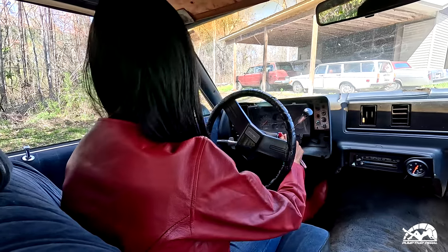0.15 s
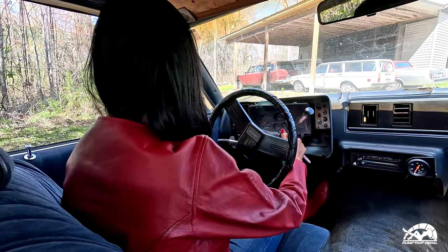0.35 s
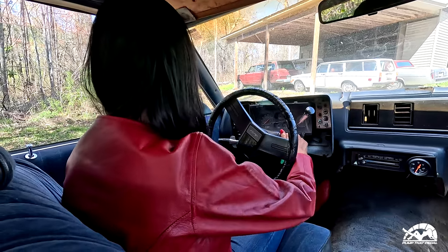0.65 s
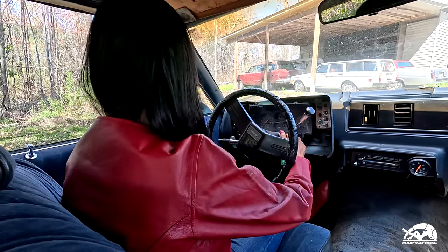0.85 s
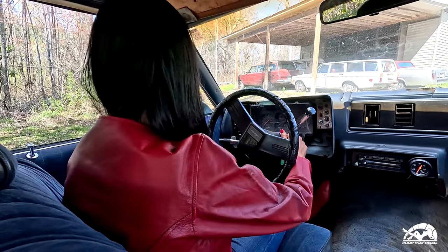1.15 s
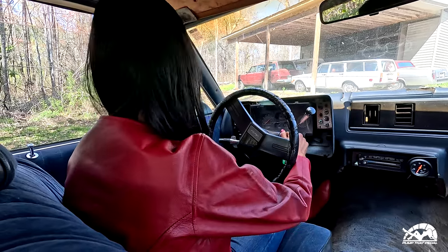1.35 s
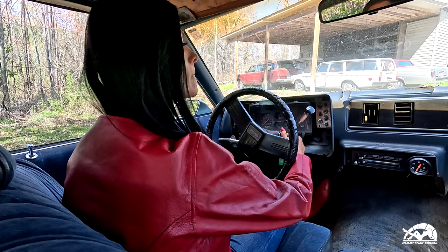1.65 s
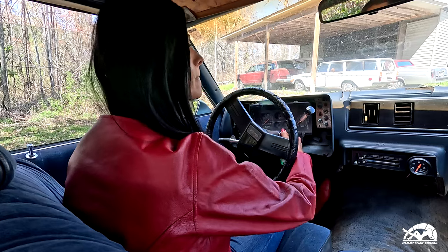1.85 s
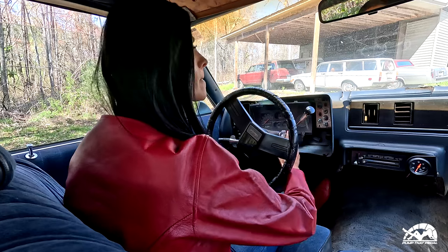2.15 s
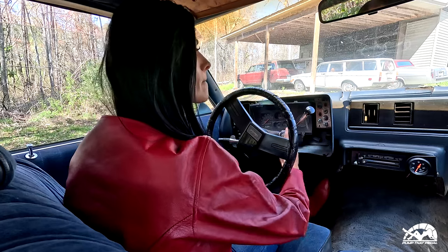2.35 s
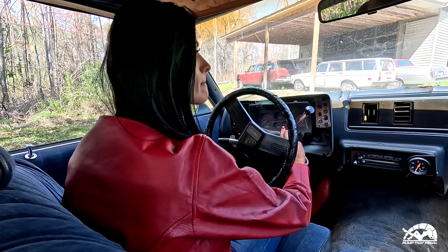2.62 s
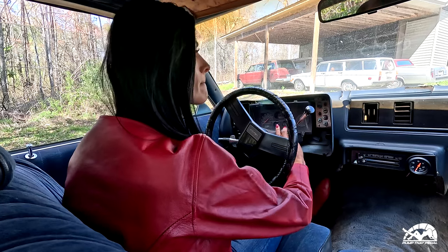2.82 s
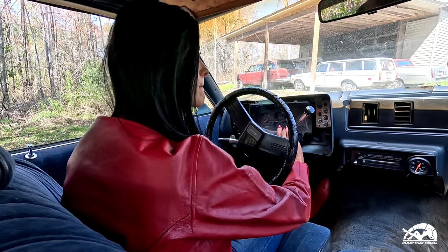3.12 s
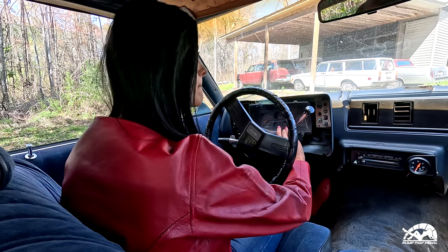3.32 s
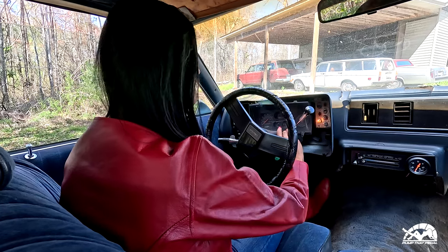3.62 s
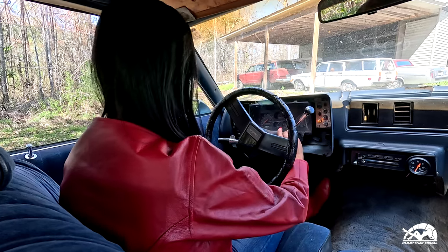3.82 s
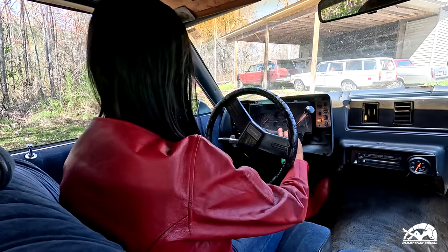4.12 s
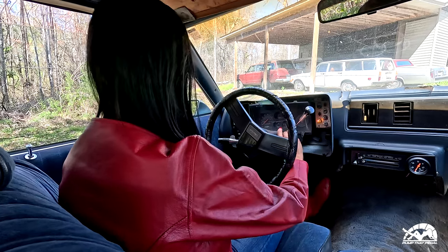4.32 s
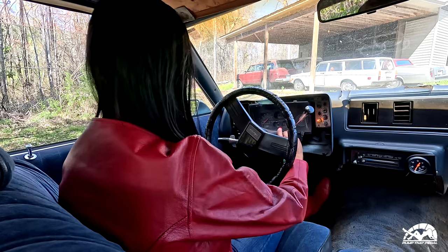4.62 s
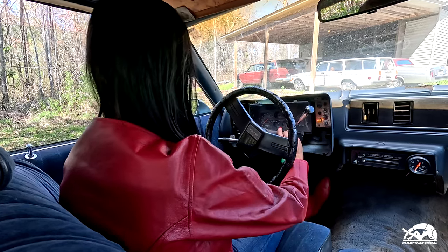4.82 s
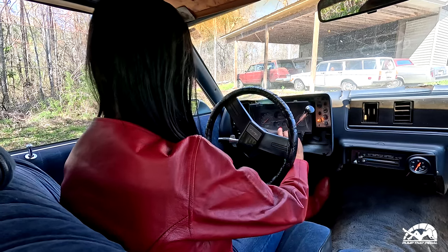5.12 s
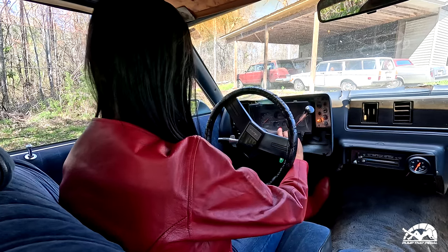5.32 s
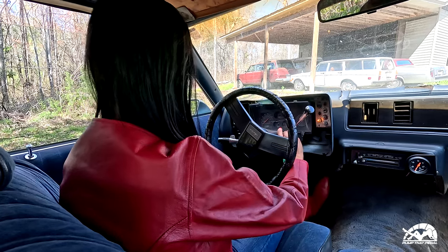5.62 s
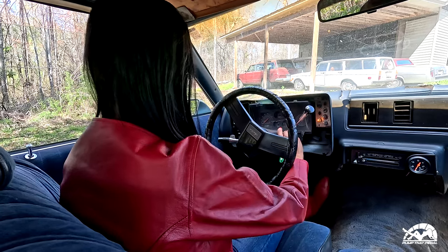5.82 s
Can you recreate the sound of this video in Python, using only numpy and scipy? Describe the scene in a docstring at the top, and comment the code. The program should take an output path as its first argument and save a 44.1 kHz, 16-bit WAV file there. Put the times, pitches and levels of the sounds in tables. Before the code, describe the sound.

A quiet car cabin holds a faint low rumble, with everything heard close up. From about 0.4 to 1 second, keys clink lightly and the ignition lock ticks, while a sleeve rustles softly. A sharp metallic snap comes at 1.7 seconds as the key slides in, followed by brighter jingling from 2 to 2.5 seconds. The lock clicks again around 2.9 and 3.1 seconds as the key turns, with a few dull knocks. At about 3.8 seconds the starter engages with a heavy clunk and a short, labouring groan, much louder than the keys. Another clunk follows near 4.2 seconds, and it settles into rapid, rhythmic cranking: a high gear whine and rattle surging with each stroke, over a deep throb from the rocking engine. The cranking slows very slightly and continues to the end, near 6 seconds, without the engine ever firing.

```python
"""Inside an old car, keys jingle and a sleeve rustles as the driver slides a key in and turns it.
The starter's magnetic switch (the solenoid) clunks and pushes a small gear into the engine's big one.
The starter groans through the first compression, when a piston squeezes the air in its cylinder.
Then it cranks the engine, which never fires: the gears whine and rattle, surging with every
compression, while the engine rocks on its mounts."""
import sys
import numpy as np
from scipy import signal
from scipy.fft import rfft, irfft
from scipy.io import wavfile
from scipy.ndimage import uniform_filter1d

SR = 44100
rng = np.random.default_rng(int(sys.argv[2]) if len(sys.argv) > 2 else 0)


def put_to_file(sound):
    """Save the sound as 16-bit audio at rate SR, in the file named by the first command-line argument."""
    columns = np.atleast_2d(sound).T  # one column per channel
    safe = np.clip(columns, -1, 1)
    whole_steps = np.round(safe * 32767)
    wavfile.write(sys.argv[1], SR, whole_steps.astype(np.int16))


N = 262836
TIME, FREQS = np.arange(N) / SR, np.fft.rfftfreq(N, 1 / SR)

# heavy blows of solenoid, small gear and first full compression: start_s, level_db, decay_s
CLUNKS = [(3.767, -43, 0.014), (3.779, -30.5, 0.026), (3.923, -40, 0.0045), (4.154, -35, 0.025)]
ENGAGE_S, ENGAGE_DB, _ = CLUNKS[1]  # the blow with which the gears meet
# how alike left and right sound: pitch_hz, likeness (0 to 1)
LIKENESS = [(30, 1), (125, 0.99), (250, 0.92), (500, 0.9), (1000, 0.83), (2000, 0.79), (4000, 0.71),
            (8000, 0.96), (13000, 0.18)]


def cranking():
    """The starter's small gear whines, rattles and clashes on the big one, loudest at each compression."""
    # ringing (+) and dips (-) of the starter's housing: pitch_hz, width_hz, level_db
    housing = [(1190, 55, 13), (1700, 100, 5), (1860, 160, -5), (2280, 160, 4), (2800, 320, 6),
               (3400, 130, 5), (4130, 120, -4), (4650, 160, -5), (5400, 140, -4), (5650, 200, 7),
               (7150, 150, 5), (8570, 200, 5)]
    # tone colour of colliding teeth: pitch_hz, level_db
    clash_colour = [(300, 3.5), (1000, -2.5), (1700, -4.5), (2800, 1), (5000, -1), (7500, -12.5),
                    (10500, -29.5), (15000, -51)]
    _, rattle_db, whine_db, hum_db, clash_db, _ = np.transpose(strokes())
    tooth_hz = starter_speed()
    teeth = np.cumsum(tooth_hz * (1 + .003 * wander(35))) / SR  # count of teeth gone by
    whine = amp(2.5) * gear_whine(teeth, tooth_hz.mean())
    whine *= surges(whine_db, rise=1, hold_s=.024, linger=.5, fall_s=.021, floor_db=-14)
    # the lowest note hums a moment ahead of its overtones
    hum = amp(-.5) * np.cos(2 * np.pi * teeth) * amp(2 * wander(40))
    hum *= surges(hum_db, rise=.7, hold_s=.005, linger=1.3, fall_s=.018, floor_db=-20, early_s=.009)
    tones = cabin_echo(whine + hum, echo_db=-15, centre=1.5)
    rattle = amp(-6.5) * gear_rattle(teeth, housing, steady=.6, puff_length=.4, flicker_db=1.5)
    rattle *= surges(rattle_db, rise=1.2, hold_s=.02, linger=.3, fall_s=.021, floor_db=-3, early_s=.004)
    # on hard strokes the teeth take up their slack with a short, bright clash
    clash = amp(-2) * noise(clash_colour, peaks=housing)
    clash *= surges(clash_db, rise=1.1, hold_s=.019, linger=.2, fall_s=.017, floor_db=-40)
    return tones + rattle + clash


def starter_speed(leap_share=.045, delay_s=.005, width_s=.01):
    """Teeth meeting per second; the speed leaps as each compression lets go and sags back at once."""
    # speed, surging once in every round of the cylinders: time_s, tooth_rate_hz
    speed = [(4.07, 585), (4.13, 562), (4.25, 565), (4.3, 582), (4.43, 555), (4.72, 556), (4.84, 574),
             (4.91, 554), (5.04, 564), (5.11, 552), (5.3, 562), (5.37, 573), (5.5, 552), (5.64, 543),
             (5.71, 550), (5.78, 547), (5.84, 562), (5.91, 546)]
    starts = np.transpose(strokes())[0]
    leaps = np.exp(-((TIME[:, None] - starts - delay_s) / width_s) ** 2).sum(1)
    return np.interp(TIME, *np.transpose(speed)) * (1 + leap_share * leaps)


def gear_whine(teeth, tooth_hz, small_gear_teeth=9, fuzz=.15):
    """Meeting teeth sing overtones; the small gear's wobble adds a faint tone above and below each."""
    # overtones: multiple_of_tooth_rate, level_db
    overtones = [(2, -1.5), (3, -8), (4, -11), (5, -8.5), (6, -9), (7, -16.5), (8, -18), (9, -17),
                 (10, -10.5), (11, -25), (12, -28), (13, -29)]
    wobble = np.exp(2j * np.pi * teeth / small_gear_teeth)
    out = np.zeros((2, N))
    for k, db in overtones:
        # each overtone reaches left and right a little out of step
        spread = np.arccos(np.clip(at_pitch(LIKENESS, k * tooth_hz), 0, 1))
        apart = spread * np.array([[.4], [-.4]]) * wander(18)
        phase, above, below = np.exp(2j * np.pi * rng.random(3))
        uneven = 1 + fuzz * (wander(130) + 1j * wander(130))
        uneven += amp(-8) * above * wobble + amp(-13) * below / wobble
        out += amp(db) * (phase * uneven * np.exp(1j * (2 * np.pi * k * teeth + apart))).real
    return out


def gear_rattle(teeth, peaks, steady, puff_length, flicker_db):
    """Each meeting of teeth throws a puff of noise into the starter's housing."""
    # gear noise heard through the wall behind the engine: pitch_hz, level_db
    through_wall = [(60, -54), (200, 1.5), (330, 6), (700, 2.5), (1000, 7), (1450, -1.5), (1900, -1),
                    (2700, -0.5), (4200, -6), (5200, -4.5), (6500, -9.5), (8500, -18), (10500, -32),
                    (15000, -51)]
    puffs = steady + np.exp(-(teeth % 1) / puff_length)
    return noise(through_wall, puffs * amp(flicker_db * wander(89)), peaks)


def beats(first_s=4.214, gap_s=.066, slowing_s=.000048):
    """Times of the compressions once up to speed; each gap is a little longer as the battery tires."""
    gaps = gap_s + slowing_s * np.arange(int((N / SR - first_s) / gap_s) + 1)
    return first_s + np.cumsum(gaps) - gaps


def strokes(settle_db_per_s=1.05):
    """Lists every compression, cylinder after cylinder, in rows like those of pick_up."""
    # the first, hurried compressions: start_s, rattle_db, whine_db, hum_db, clash_db, attack_s
    pick_up = [(4.068, -41.5, -45.5, -69, -40.5, 0.0087), (4.11, -43, -47, -66, -39.5, 0.017),
               (4.159, -45.5, -47, -66, -57, 0.018)]
    # the eight unequal cylinders: late_s, rattle_db, whine_db, hum_db, clash_db, attack_s
    cylinders = [(0.0027, -38.5, -42.5, -48, -35, 0.0041), (-.0012, -40.5, -41, -42, -38.5, .012),
                 (-0.0081, -39.5, -41.5, -52.5, -37.5, 0.033), (-0.0022, -38.5, -44.5, -44.5, -53, 0.021),
                 (-0.0036, -41, -41.5, -41.5, -38, 0.0034), (-0.0046, -40.5, -40.5, -43, -40, 0.014),
                 (-0.0032, -37.5, -42.5, -49, -43.5, 0.024), (0.001, -38.5, -45, -42.5, -62, 0.023)]
    rows, times = list(pick_up), beats()
    for k, s in enumerate(times):
        late, rattle, whine, hum, clash, attack = cylinders[k % len(cylinders)]
        settled = settle_db_per_s * (s - times.mean())  # settling gears rattle less and hum more
        rows.append((s + late, rattle - settled, whine, hum + settled, clash - 2 * settled, attack))
    return rows


def surges(levels_db, rise, hold_s, linger, fall_s, floor_db, early_s=.003):
    """Load on the gears: each stroke swells, holds and lets go; rise and linger scale its attack time."""
    starts, *_, attacks = np.transpose(strokes())
    fade_in = np.clip((TIME - starts[0]) / .03, 0, 1)
    out = amp(floor_db + np.interp(TIME, starts, levels_db)) * fade_in
    t = TIME[:SR // 8]
    for s, db, attack in zip(starts, levels_db, attacks):
        swell = np.sin(np.pi / 2 * np.minimum(t / (rise * attack), 1)) ** 2
        release = np.exp(-(np.maximum(t - hold_s - linger * attack, 0) / fall_s) ** 2)
        add(out, s - early_s, amp(db) * swell * release)
    return out


def run_up(gain_db=-1, roughness=.38, grind_db=4):
    """The starter almost stalls on the first compression: it climbs, sinks to a groan and recovers."""
    # the starter labouring up to speed: time_s, tooth_rate_hz, rattle_db, groan_db
    effort = [(3.76, 102.8, -54, -77), (3.789, 201.6, -47, -49), (3.875, 299.4, -49, -41),
              (3.929, 319.8, -38, -35), (3.98, 225.9, -43, -32), (4.007, 149.8, -49.5, -37),
              (4.044, 115.8, -47, -49.5), (4.071, 326.6, -43, -46), (4.1, 388, -62, -34.5),
              (4.135, 373, -57, -53)]
    # tone colour of the groan: pitch_hz, level_db
    groan_colour = [(80, 10), (230, -3), (460, -4), (700, -23), (950, -11), (1500, -20.5), (3400, -25),
                    (6000, -38), (12000, -84)]
    # the housing's broad answer to scraping teeth: pitch_hz, width_hz, level_db
    scrape = [(970, 120, 8), (1700, 200, 3), (2700, 240, 7), (3430, 180, 9), (4360, 290, 4), (5700, 300, 5)]
    times, *columns = np.transpose(effort)
    hz, rattle_db, groan_db = (np.interp(TIME, times, c) for c in columns)
    teeth = np.cumsum(hz * (1 + .018 * wander(110))) / SR
    tone = np.zeros(N)
    for k in range(1, 13):
        db = at_pitch(groan_colour, k * hz) + peak(k * hz, centre_hz=455, width_hz=76, height_db=4.6)
        tone += amp(db + grind_db * wander(99)) * np.cos(2 * np.pi * (k * teeth + rng.random()))
    groan = tone + roughness * noise(groan_colour, np.exp(-(teeth % 1) / .43))
    rattle = gear_rattle(teeth, scrape, steady=.7, puff_length=.3, flicker_db=3)
    running = (TIME > times[0]) & (TIME < times[-1])
    return amp(gain_db) * running * (amp(groan_db) * groan + amp(rattle_db) * rattle)


def engine_rocking():
    """Every compression twists the engine on its mounts, and the cabin throbs and booms."""
    # the engine's swings and the cabin's throbs after a beat: delay_s, level_db, pitch_hz, half_length_s
    swings = [(0.0237, 2.5, 34.7, 0.03), (0.017, -10, 23, 0.0053)]
    throbs = [(.0245, -33.5, 104.5, .024), (.02, -42.5, 219, .016)]
    # strength of the rocking and of the boom: time_s, level_db
    rock_levels = [(4.2, -17.5), (4.45, -20.5), (4.62, -31), (4.79, -14.5), (4.93, -21.5), (5.05, -17),
                   (5.34, -18), (5.5, -26.5), (5.66, -19.5), (5.95, -23.5)]
    boom_levels = [(3.75, -44), (3.8, -26), (4.03, -28.5), (4.14, -36.5), (4.17, -22), (4.36, -28.5),
                   (5.26, -27), (5.34, -33), (5.58, -32), (5.96, -26.5)]
    # tone colour of the boom: pitch_hz, level_db
    boom_colour = [(20, -27.5), (45, 1.5), (62, 5), (88, -4.5), (104, -9), (125, -6), (170, -20.5),
                   (225, -16.5), (300, -27), (600, -33), (3000, -100)]
    out = np.zeros(N)
    for s in beats():
        rock_db = np.interp(s, *np.transpose(rock_levels))
        for delay, db, hz, half in swings:
            out += thump(s + delay, rock_db + db, hz, half)
        for delay, db, hz, half in throbs:
            out += thump(s + delay, db + 2.5 * rng.standard_normal(), hz, half)
    engaged = np.clip((TIME - ENGAGE_S) / .014, 0, 1)
    return out + amp(-3) * noise(boom_colour) * level(boom_levels) * engaged


def clunks(rise_s=.0087, hold_s=.013):
    """Iron slams home and chatters briefly; the small gear makes the big one ring as they meet."""
    # tone colour of the blows: pitch_hz, level_db
    clunk_colour = [(60, -6), (200, 19), (450, 1), (800, 6.5), (1000, -4), (1220, 5.5), (1450, -9),
                    (3300, -4), (6500, -12.5), (9000, -22), (13000, -54)]
    # notes of the big gear: pitch_hz, level_db, ring_s (time to fade by 60 dB)
    gear_notes = [(1215, -1, 0.1), (1670, -7.5, 0.05), (2745, -17, 0.11)]
    blows = np.zeros(N)
    for s, db, decay in CLUNKS:
        fade = np.exp(-np.maximum(TIME - s - hold_s, 0) / decay)
        blows += amp(db) * np.clip((TIME - s) / rise_s, 0, 1) * fade
    out, t = noise(clunk_colour) * blows, TIME[:SR // 4]
    ring = sum(amp(db - 60 * np.maximum(t - hold_s, 0) / ring_s) * np.sin(2 * np.pi * hz * t)
               for hz, db, ring_s in gear_notes)
    add(out, ENGAGE_S, amp(ENGAGE_DB - 2) * np.minimum(t / rise_s, 1) * ring)
    return out


def keys(brush_gap_s=.045):
    """Keys clink, and brush each other lightly by chance while the bunch dangles."""
    # the clearest clinks: start_s, middle_db, treble_db, low_db, decay_s, pitch_hz
    clinks = [(.395, -55.5, -55, -67, .005, 8800), (.4725, -54, -44.5, -48, 0.0059, 7400),
              (.5601, -60.5, -54.5, -58, 0.012, 7320), (.632, -59.5, -58.5, -63, 0.0094, 8300),
              (.718, -65, -64, -74, .004, 7900), (.734, -55.5, -57, -66, .004, 7900),
              (.7874, -55, -45.5, -51, 0.0094, 7700), (.934, -49.5, -50.5, -55, 0.0024, 6800),
              (.945, -70, -59, -61, 0.0043, 9300), (1.203, -61.5, -71, -53, 0.0046, 2000),
              (1.405, -61, -60, -72, 0.01, 5450), (2.0034, -44.5, -42.5, -53, 0.01, 6100),
              (2.0214, -46, -40, -62, 0.029, 6750), (2.081, -39, -35, -49, 0.0073, 7150),
              (2.073, -52, -40, -50, 0.0045, 7500), (2.096, -51, -41.5, -66, 0.0066, 8400),
              (2.111, -50.5, -51, -57, 0.0042, 7300), (2.1405, -75, -52, -72, 0.0052, 7300),
              (2.1829, -56, -56, -68, .005, 5600), (2.2113, -52.5, -42, -71, 0.02, 5170),
              (2.2926, -66, -56, -84, 0.0034, 7200), (2.3086, -52, -56, -62, 0.0068, 2570),
              (2.2432, -52.5, -55, -67, .006, 5170), (2.3484, -49, -44.5, -71, 0.01, 5160),
              (2.3818, -51, -46.5, -74, 0.028, 6740), (2.427, -47, -42.5, -69, 0.0055, 5130),
              (2.451, -44, -43, -63, .005, 7100), (2.469, -56, -47, -69, 0.0076, 5700),
              (2.4936, -44.5, -43.5, -55, 0.0044, 5670), (2.6692, -58, -44, -69, 0.0084, 5750),
              (2.847, -52.5, -47.5, -72, 0.0066, 5630), (3.03, -50, -50, -51.5, 0.006, 3170),
              (3.0476, -52.5, -48.5, -58, 0.035, 9100), (3.1834, -41, -34.5, -46.5, 0.0032, 5270),
              (3.3558, -65, -55, -85, 0.0031, 7700)]
    # notes of the keys: pitch_hz, level_db
    key_notes = [(2640, 4.5), (3430, 6), (5090, 2), (5850, -1), (6185, -2), (6860, 2), (7200, 9.5),
                 (8260, -7), (8650, 5.5), (9190, 8), (10200, -7)]
    # spells of dangling: start_s, end_s, treble_db
    jingles = [(1.671, 1.874, -56.5), (2.23, 2.264, -51.5), (2.711, 2.787, -59.5), (3.068, 3.147, -52),
               (3.73, 3.77, -56)]
    brushes = []
    for start, end, db in jingles:
        count = np.clip(round((end - start) / brush_gap_s), 1, 8)
        for k, (when, force, which) in enumerate(rng.random((8, 3))[:count]):
            s = start + (end - start) * (k + when) / count
            treble_db = db + 1.5 * (2 * force - 1)
            hz = key_notes[int(which * len(key_notes))][0]
            brushes.append((s, treble_db - 2.5, treble_db, treble_db - 4.5, .007, hz))
    return metal_touches(clinks + brushes, key_notes, ring_s=.052, ring_db=5.5, rise_s=.009, detune=.05)


def lock():
    """The ignition lock snaps as the key slides in and turns."""
    # snaps: start_s, middle_db, treble_db, low_db, decay_s, pitch_hz
    snaps = [(.378, -53, -63, -61, 0.0063, 3530), (.418, -47.5, -51, -44, 0.005, 4830),
             (.77, -54.5, -66, -49, 0.0066, 4670), (.985, -83, -85, -45, 0.0055, 1060),
             (1.741, -33.5, -34, -56.5, 0.005, 4350), (1.762, -52, -54, -56, 0.012, 2380),
             (1.964, -41.5, -70, -52, 0.0047, 3100), (2.437, -41.5, -46, -77, 0.0049, 2600),
             (2.554, -54.5, -71, -49, 0.012, 1285), (2.937, -32.5, -47, -54.5, 0.0015, 3180),
             (3.143, -33.5, -33.5, -43, 0.0099, 4020)]
    # notes of the lock: pitch_hz, level_db
    lock_notes = [(1830, -38), (2400, -2), (3110, -5), (3600, 33), (3820, -18), (4300, -28), (5330, -7),
                  (5830, -5), (6800, 29), (8100, 2)]
    return metal_touches(snaps, lock_notes, ring_s=.026, ring_db=-6, rise_s=.0055, detune=.015)


def metal_touches(rows, notes, ring_s, ring_db, rise_s, detune, hold_s=.006):
    """Each touch is a short scatter of tiny hits that ring the metal, favouring its main pitch."""
    # tone colour of small metal hits: pitch_hz, level_db
    touch_colour = [(200, 19.5), (700, -0.5), (1500, 2), (5000, -1.5), (8500, 0), (10500, -14),
                    (14500, -21)]
    out, t = np.zeros(N), TIME[:SR // 8]
    bands = [signal.butter(3, edges_hz, "band", fs=SR, output="sos")
             for edges_hz in ((1600, 4800), (4800, 14500), (250, 1600))]  # middle, treble, low
    scatter = noise(touch_colour, amp(2.5 * wander(500)))[0]
    attack = np.minimum(t / rise_s, 1) ** 2
    for k, (s, *bands_db, decay, main_hz) in enumerate(rows):
        fade = np.exp(-np.maximum(t - hold_s, 0) / max(decay, .002))
        blow = scatter[k * SR // 10:][:len(t)] * fade
        blow += signal.lfilter(*signal.iirpeak(main_hz, 6, fs=SR), blow)
        ring = metal_ring(t, notes, main_hz, detune) * amp(ring_db - 60 * t / ring_s)
        for band, db in zip(bands, bands_db):
            part = signal.sosfilt(band, attack * (blow + ring))
            loudest = np.sqrt(uniform_filter1d(part ** 2, size=130).max())
            add(out, s - rise_s / 2, amp(db) * part / loudest)
    return out


def metal_ring(t, notes, main_hz, detune):
    """Struck metal sounds several notes at once, and no two touches ring quite alike."""
    hz, db = np.transpose(notes)[:, :, None]
    near_main = np.exp(-(np.log(hz / main_hz) / .15) ** 2)
    shares = amp(db + 4 * rng.standard_normal(hz.shape) + 5 * near_main)
    shares = np.vstack([shares, [shares.max()]])
    pitches = np.vstack([hz * (1 + detune * rng.standard_normal(hz.shape)), [main_hz]])
    waves = np.sin(2 * np.pi * (pitches * t + rng.random(shares.shape)))
    return (shares * waves).sum(0) / np.linalg.norm(shares)


def dull_thumps():
    """The seat, steering column and engine mounts give low knocks."""
    # knocks: peak_s, level_db, pitch_hz, half_length_s
    knocks = [(0.203, -35.5, 219, 0.017), (0.994, -38.5, 154, 0.0095), (2.885, -27, 25.8, 0.036),
              (3.168, -33, 170, 0.0059), (3.242, -25.5, 28.2, 0.022), (3.429, -38, 125, 0.0086),
              (3.845, -13.5, 31.2, 0.041), (3.998, -16, 49.7, 0.015), (4.089, -19.5, 25.14, 0.026),
              (4.167, -17.5, 38, 0.026), (4.197, -15.5, 78, 0.0088)]
    return sum(thump(*row) for row in knocks)


def thump(peak_s, db, hz, half_length_s):
    """A few swings of a heavy part that quickly comes to rest."""
    out, near = np.zeros(N), abs(TIME - peak_s) < 3 * half_length_s
    t = TIME[near] - peak_s
    out[near] = amp(db) * np.exp(-(t / half_length_s) ** 2) * np.cos(2 * np.pi * hz * t)
    return out


def rustle():
    """The sleeve and key ring rub with a soft, grainy hiss."""
    # tone colour of the rubbing: pitch_hz, level_db
    rustle_colour = [(300, -46), (1500, 8.5), (4000, -2), (5500, 4), (7500, 4.5), (9300, -2),
                     (10500, -11.5), (14500, -18)]
    # its strength: time_s, level_db
    rustle_levels = [(.1, -81.5), (.15, -75), (.62, -68.5), (.91, -75), (1.3, -76.5), (1.57, -68.5),
                     (1.95, -70), (2.25, -58.5), (2.42, -77), (2.9, -64), (3.05, -81), (3.44, -71),
                     (3.75, -75)]
    grain = amp(3 * wander(60) + 3 * wander(1200))
    return noise(rustle_colour, grain) * level(rustle_levels)


def still_cabin():
    """A faint, steady hush and a low rumble that swells and sinks."""
    # tone colours of the hush and the rumble: pitch_hz, level_db
    hush = [(150, 8.5), (300, 11), (500, 1), (780, -1), (1100, 8.5), (1500, 1.5), (2200, -8), (4000, -14),
            (9000, -22), (12000, -73)]
    rumble = [(10, -37), (22, -0.5), (33, 4), (50, -5), (75, -11.5), (110, -15.5), (160, -18), (220, -20.5),
              (300, -42.5), (500, -44), (1000, -99), (4000, -110)]
    # strength of the rumble: time_s, level_db
    rumble_levels = [(0.0, -45.5), (0.19, -40.5), (2.06, -45), (2.15, -41), (2.62, -43.5), (2.88, -38),
                     (3.0, -45.5), (3.21, -37.5), (3.7, -44.5)]
    return amp(-66) * noise(hush) + amp(2) * noise(rumble) * level(rumble_levels)


def cabin_echo(sound, echo_db, centre=1):
    """Adds short, dense echoes off glass and dashboard; more centre makes left and right more alike."""
    # how long echoes last: pitch_hz, ring_s (time to fade by 60 dB)
    echo_times = [(100, 0.21), (400, 0.18), (1100, 0.11), (3000, 0.11), (9000, 0.04)]
    echoes = rng.standard_normal((3, SR // 4)) * (rng.random((3, SR // 4)) < .2)
    echoes[:, :SR // 500] = 0  # the first echo takes 2 ms
    hz, t, spectra = signal.stft(echoes, SR, nperseg=128)
    fade = amp(-60 * t / at_pitch(echo_times, hz)[:, None])
    tail = signal.istft(spectra * fade, SR, nperseg=128)[1]
    tail = centre * tail[2] + tail[:2]
    tail /= np.linalg.norm(tail, axis=1, keepdims=True)
    return sound + amp(echo_db) * signal.fftconvolve(np.atleast_2d(sound), tail, axes=1)[:, :N]


def noise(colour, loudness=1, peaks=()):
    """Noise shaped by a loudness curve, a tone colour and ringing peaks, partly alike left and right."""
    mid, side = rfft(rng.standard_normal((2, N)) * loudness)
    same = np.clip(at_pitch(LIKENESS, FREQS), 0, 1)
    mid, side = mid * np.sqrt(1 + same), side * np.sqrt(1 - same)
    gain_db = at_pitch(colour, FREQS) + sum(peak(FREQS, *row) for row in peaks)
    return unit_level(irfft(np.array([mid + side, mid - side]) * amp(gain_db), N))


def peak(hz, centre_hz, width_hz, height_db):
    """The boost in dB near a pitch at which a part likes to ring."""
    return height_db / (1 + (2 * (hz - centre_hz) / width_hz) ** 2)


def wander(hz):
    """A smooth random wobble of typical size 1, no faster than about hz."""
    return unit_level(irfft(rfft(rng.standard_normal(N)) * np.exp(-(FREQS / hz) ** 2), N))


def amp(db):
    """Turns decibels into a gain."""
    return 10 ** (np.asarray(db) / 20)


def unit_level(x):
    """Scales a signal to an average power of 1."""
    return x / np.sqrt(np.mean(x ** 2) + 1e-20)


def at_pitch(rows, hz):
    """Looks up a value between rows of pitch_hz, value."""
    pitches, values = np.transpose(rows)
    return np.interp(np.log(hz + 1), np.log(pitches + 1), values)


def level(rows):
    """Gain over time from rows of time_s, level_db."""
    return amp(np.interp(TIME, *np.transpose(rows)))


def add(mix, start_s, sound):
    """Mixes a sound in at start_s."""
    part = mix[..., max(round(start_s * SR), 0):][..., :sound.shape[-1]]
    part += sound[..., :part.shape[-1]]


def scene():
    """Keys and starter over the low rumble of the still cabin."""
    background = still_cabin()
    snaps, clinks, rubbing = lock(), keys(), rustle()
    metal = amp(.5) * cabin_echo(snaps, echo_db=-9.5) + amp(-3) * cabin_echo(clinks, echo_db=-6)
    starter = clunks() + run_up() + cranking()
    return starter + engine_rocking() + metal + dull_thumps() + rubbing + background


def record(dry, top_hz=15000):
    """Two microphones hear slightly different tone and timing, and nothing far above top_hz."""
    # how much louder the left is: pitch_hz, level_db
    balance = [(200, 0), (600, .2), (1100, 2.3), (2000, .1), (4000, -.7), (8000, 0)]
    # how far the left is ahead: pitch_hz, phase_radians
    lead = [(30, 0), (250, -.05), (500, -.25), (1120, -.5), (1900, -.6), (3300, -.7), (5500, -.3),
            (12000, -.2)]
    left_over_right = amp(at_pitch(balance, FREQS)) * np.exp(1j * at_pitch(lead, FREQS))
    microphones = left_over_right ** np.array([[.5], [-.5]])
    heard = irfft(rfft(dry * signal.windows.tukey(N, .002)) * microphones, N)
    treble_cut = signal.firwin(511, top_hz, window=("kaiser", 9), fs=SR)
    return signal.oaconvolve(heard, treble_cut[None], "same")


dry = scene()
out = record(dry)
put_to_file(out)
```